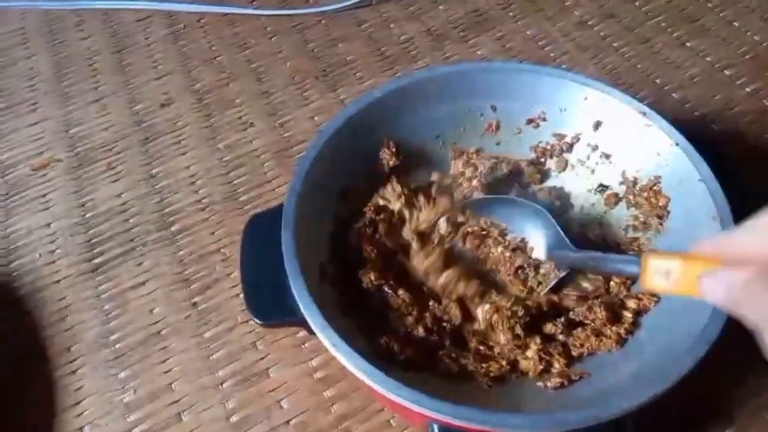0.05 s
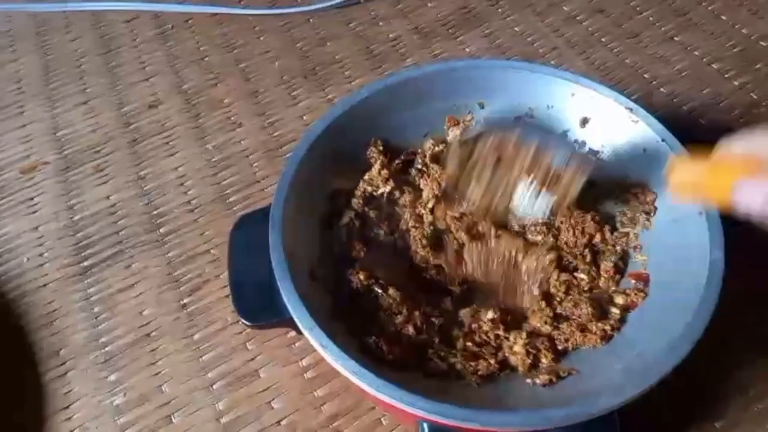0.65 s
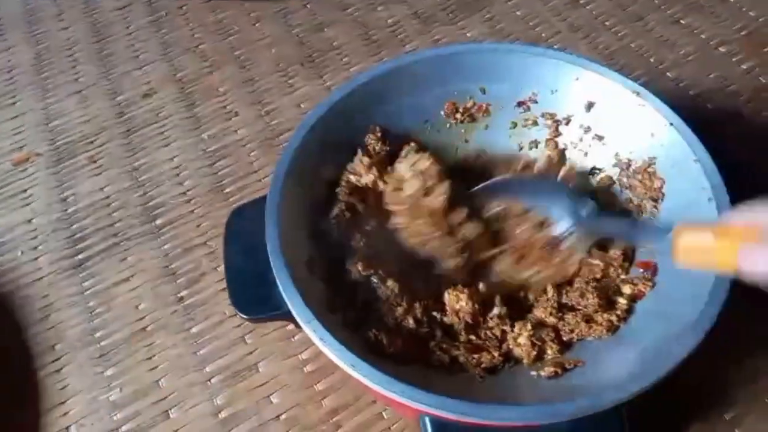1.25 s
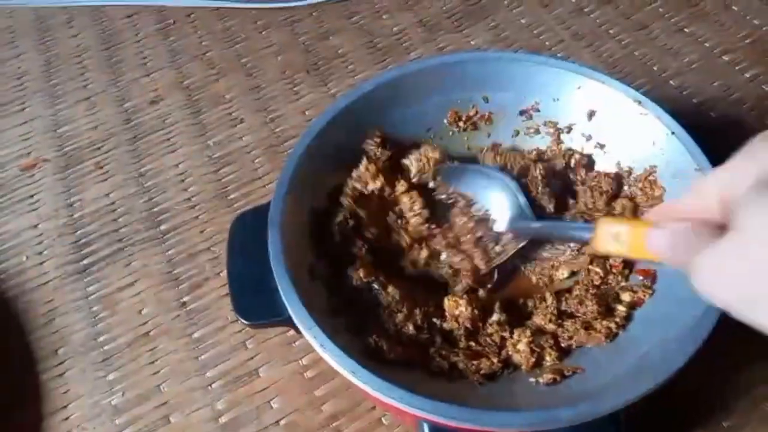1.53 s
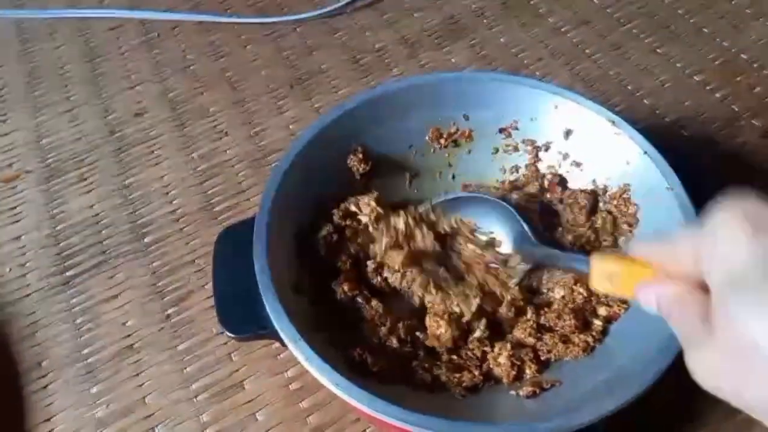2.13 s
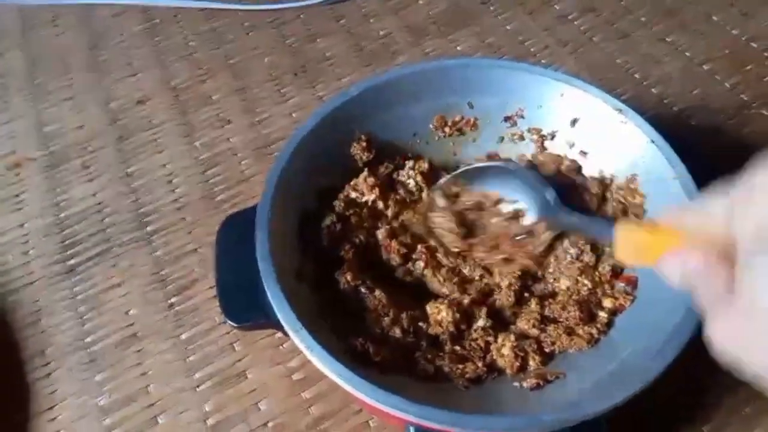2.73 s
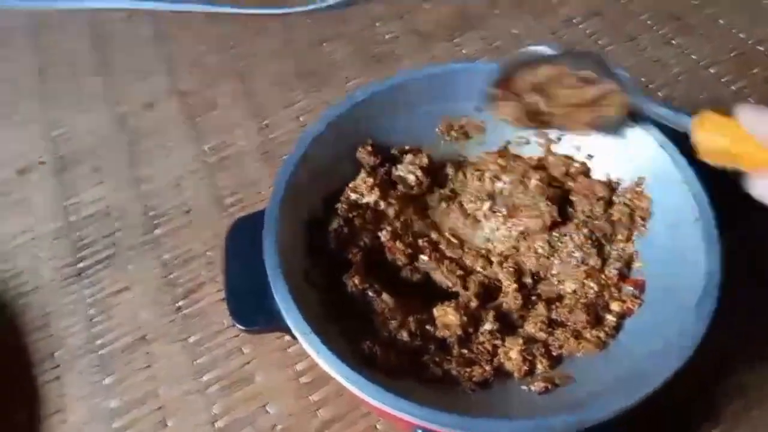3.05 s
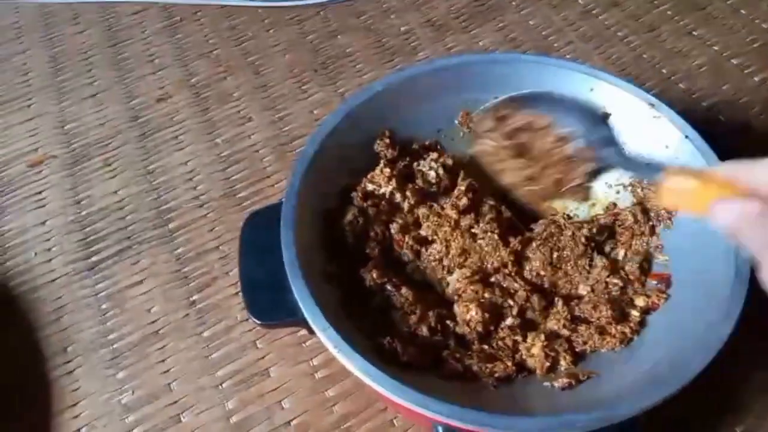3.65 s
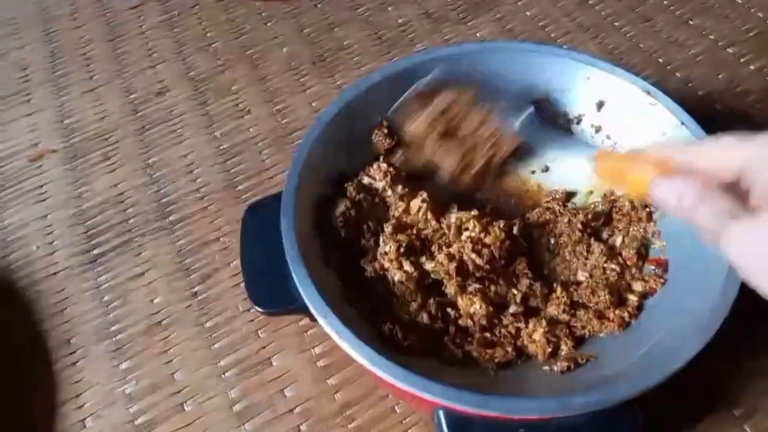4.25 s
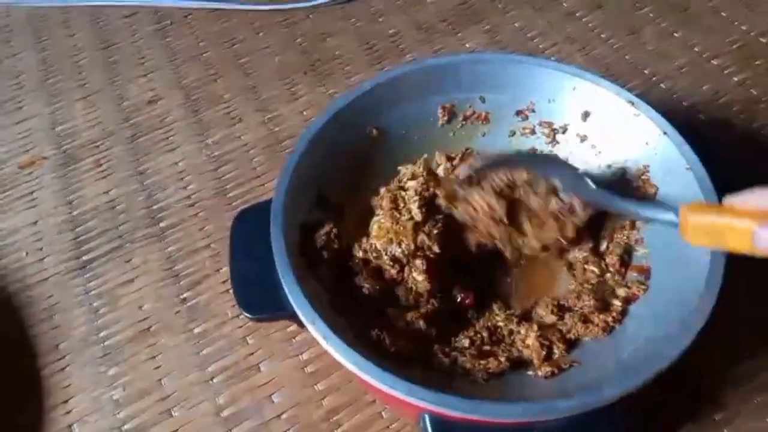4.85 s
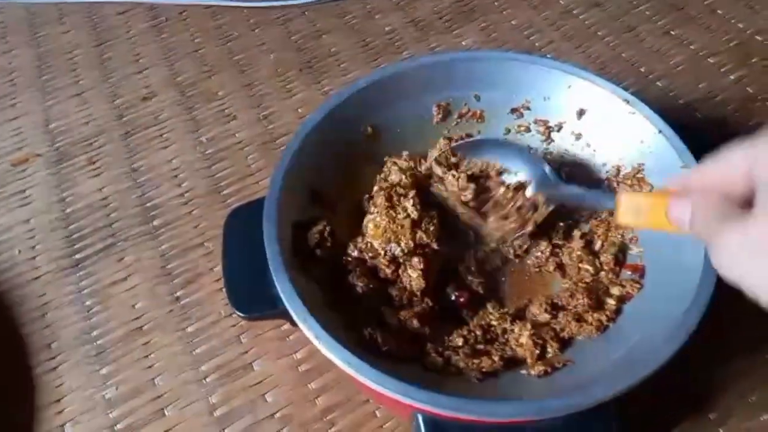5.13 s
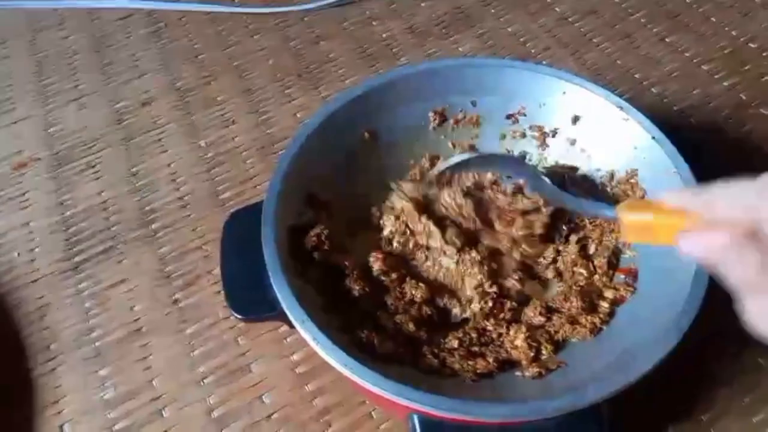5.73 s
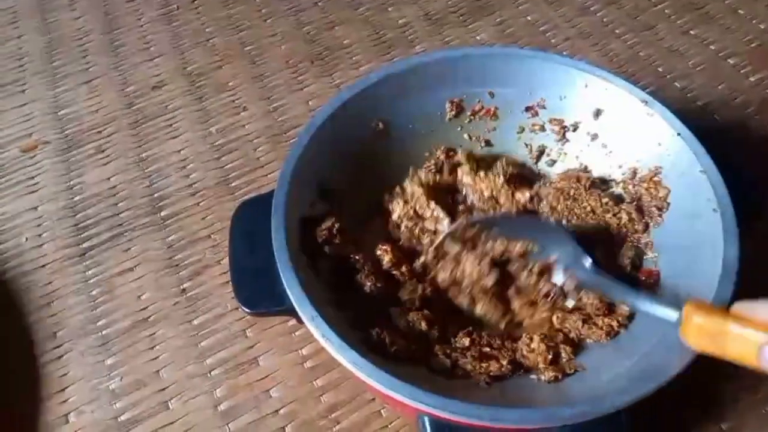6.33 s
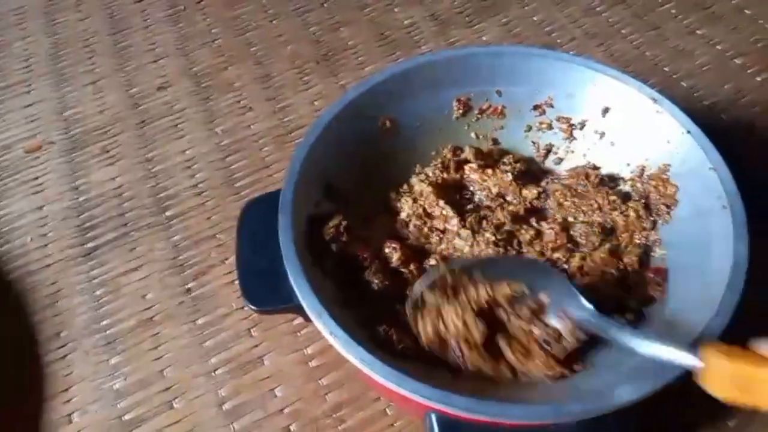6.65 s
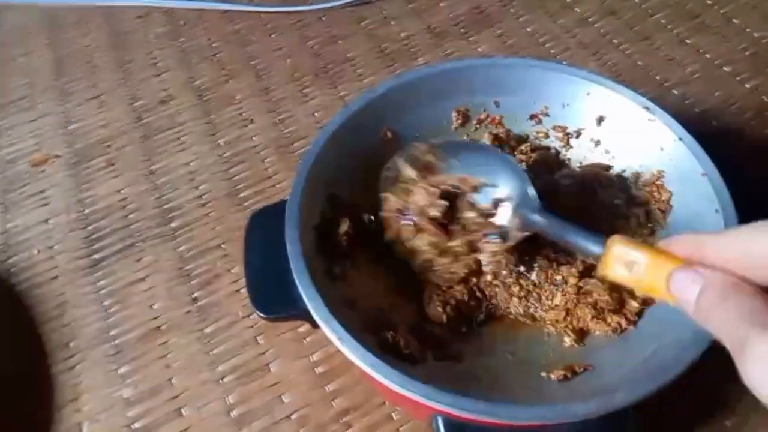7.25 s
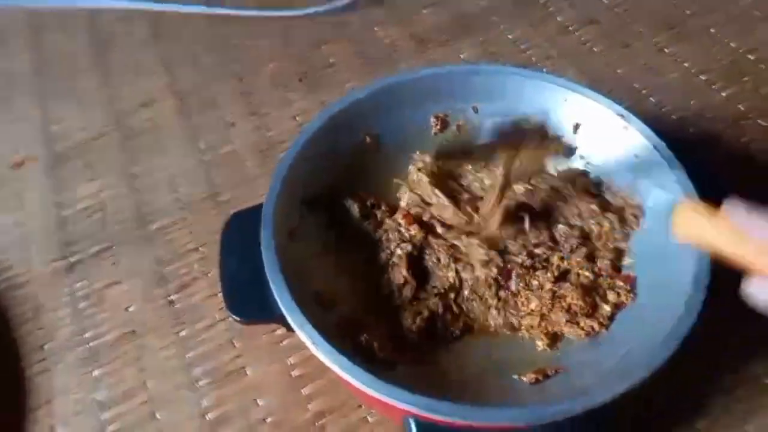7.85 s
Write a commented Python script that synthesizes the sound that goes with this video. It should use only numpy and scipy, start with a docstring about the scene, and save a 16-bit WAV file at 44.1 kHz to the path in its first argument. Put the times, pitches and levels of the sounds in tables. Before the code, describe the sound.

Thick paste sizzles softly in a small frying pan throughout, close to the microphone and slightly to the left. A steel spoon stirs it in quick, uneven strokes, each bringing a wet squelch, a grainy drag and a swell of hiss. For the first three seconds the spoon makes only light scrapes and ticks. A sharp metal knock and scrape comes at about 3.2 seconds, with further clinks at 3.7, 4.2 and 6.3. The loudest knocks land at 6.7 and 7 seconds, with a scrape and a tiny squeak between them, followed by a lighter tap at 7.5. They ring briefly in the kitchen. From about 1 second a draught rumbles and thumps on the microphone, first only on the right, then on both sides from 3 seconds, strongest around 5.7 and just before the end at 8 seconds.

```python
"""Thick paste sizzles and squelches as a steel spoon stirs it in a small electric frying pan.
Steam bubbles burst in the oil, and each stroke tears the wet paste and drags it over the pan floor.
Now and then the spoon knocks, scrapes or squeaks; knocks and scrapes ring the metal and echo in the
kitchen. A draught rumbles and thumps on the two microphone openings (ports) of a phone close by,
at first only the right one."""
import sys
import numpy as np
from scipy import signal
from scipy.fft import rfft, irfft, next_fast_len
from scipy.io import wavfile
from scipy.ndimage import uniform_filter1d

SR = 44100
rng = np.random.default_rng(int(sys.argv[2]) if len(sys.argv) > 2 else 0)


def digitize_waveform(pressure):
    """Quantize a signal to 16-bit integers and store it at the path in sys.argv[1].

    Rows of a 2-D input are taken as channels; values are limited to [-1, 1].
    """
    field = np.atleast_2d(pressure).T
    bounded = np.clip(field, -1, 1)
    quanta = np.round(bounded * 32767).astype(np.int16)
    wavfile.write(sys.argv[1], SR, quanta)


N = 352869
TIME = np.arange(N) / SR


def undb(db):
    """Turn decibels into a number to multiply by."""
    return 10 ** (np.asarray(db) / 20)


def unit(x):
    """Scale a signal to an average strength (rms) of 1."""
    return x / np.sqrt(np.mean(x ** 2) + 1e-20)


def equalise(x, points):
    """Turn each frequency up or down along a curve of (frequency [Hz], level [dB]) points."""
    size = next_fast_len(x.shape[-1])
    hz, db = np.transpose(points)
    bin_hz = np.arange(size // 2 + 1) * SR / size
    gain = undb(np.interp(np.log(bin_hz + 1), np.log(hz), db))
    return irfft(rfft(x, size) * gain, size)[..., :x.shape[-1]]


def colour(x, points):
    """Shape the tone of x, then set its strength to 1."""
    return unit(equalise(x, points))


def band(x, lo_hz, hi_hz):
    """Keep the frequencies between two limits."""
    return signal.sosfilt(signal.butter(2, [lo_hz, min(hi_hz, .45 * SR)], "band", fs=SR, output="sos"), x)


def walk(rate):
    """A wandering curve of strength 1 that glides to a new random value rate times a second."""
    hold = max(int(SR / rate), 1)
    steps = rng.standard_normal(N)[np.arange(N) // hold]
    return unit(uniform_filter1d(steps, hold))


def pops(rate, spread_db, size=N):
    """Random clicks, rate a second; spread_db makes a few stand out."""
    strength = undb(spread_db * np.minimum(rng.exponential(size=size), 5))
    return unit((rng.random(size) < rate / SR) * rng.choice([-1, 1], size) * strength)


def swell(start, length, rise_s, sag_db_per_s, fade_s):
    """A loudness curve: it rises, holds or sags, then falls 60 dB every fade_s."""
    age = TIME - start
    fall_db = sag_db_per_s * np.clip(age, 0, length) + 60 * np.maximum(age - length, 0) / fade_s
    return np.clip(age / rise_s, 0, 1) * undb(-fall_db)


def sideways(x, left_db):
    """Make the left side louder than the right by left_db."""
    return x * undb(np.array([[left_db], [-left_db]]) / 2)


def add(track, s, sound):
    """Mix a stereo sound into the track at time s."""
    start = int(s * SR)
    track[:, start:start + sound.shape[1]] += sound[:, :N - start]


def even_out(x, hold_s):
    """Hold the strength near 1 over each stretch of hold_s; quicker bumps remain."""
    return x / np.sqrt(uniform_filter1d(x ** 2, int(hold_s * SR)) + 1e-6)


def noise(points):
    """Noise with the given tone, unrelated on the left and right."""
    return colour(rng.standard_normal((2, N)), points)


# tone of the kitchen's background (frequency [Hz], level [dB])
MURMUR_TONE = [(20, -20), (70, -5), (150, 0), (400, -3.5), (1000, -11), (10000, -15)]
def kitchen_murmur():
    """A faint, low, steady noise fills the room."""
    return undb(-63.5) * noise(MURMUR_TONE)


# tone of the wind's deep rumble and of its small swirls (frequency [Hz], level [dB])
RUMBLE_TONE = [(20, -42), (35, -13.5), (60, 4.5), (80, 3.5), (115, -0.5), (160, -13), (240, -27),
               (400, -34.5), (900, -60)]
EDDY_TONE = [(50, -17), (130, 3.5), (230, 4.5), (330, -12.5), (500, -30), (1000, -61)]
# gusts of air (start [s], length [s], left level [dB], right level [dB])
AIR_GUSTS = [(0.95, 0.35, -82, -45.5), (1.385, 0.034, -73, -42), (1.5, 0.21, -76, -45),
             (2.182, 0.4, -86, -39.5), (2.399, 0.2, -60, -37.5), (2.727, 0.26, -61, -35),
             (2.908, 0.098, -33.5, -32), (2.98, 0.17, -48, -34), (3.17, 0.036, -46, -39),
             (3.512, 0.018, -61, -29.5), (3.607, 0.13, -48, -43.5), (3.723, 0.096, -56, -28),
             (3.82, 0.19, -41, -42.5), (4.052, 0.33, -50, -38.5), (4.223, 0.21, -50, -36),
             (4.46, 0.16, -48, -33.5), (4.638, 0.14, -36.5, -41), (4.858, 0.061, -42, -39),
             (4.955, 0.064, -33, -41.5), (5.057, 0.14, -41, -43.5), (5.264, 0.18, -38, -34.5),
             (5.462, 0.23, -31.5, -30), (5.669, 0.14, -23, -30.5), (5.88, 0.11, -35.5, -47),
             (6.029, 0.099, -39, -31), (6.166, 0.035, -43, -42), (6.27, 0.31, -45.5, -53.5),
             (6.613, 0.038, -40, -47), (6.692, 0.25, -54, -35.5), (6.945, 0.02, -28.5, -32),
             (6.992, 0.21, -48, -41), (7.227, 0.25, -59, -42), (7.406, 0.2, -42, -36),
             (7.553, 0.32, -31.5, -34), (7.832, 0.043, -22, -27), (7.904, 0.22, -29.5, -38)]
def draught():
    """Moving air rumbles on each port; stronger gusts shed smaller, higher swirls (eddies)."""
    power = undb(-73) ** 2  # nearly still air
    for start, length, left_db, right_db in AIR_GUSTS:
        shape = swell(start, length, rise_s=.033, sag_db_per_s=0, fade_s=.32)
        power = power + (undb([[left_db], [right_db]]) * shape) ** 2
    gust = np.sqrt(power)
    eddies = even_out(noise(EDDY_TONE), hold_s=.054) * undb(-6 + 5.5 * walk(45))
    eddies *= (gust / undb(-25.5)) ** .7
    rumble = even_out(noise(RUMBLE_TONE), hold_s=.04)
    bumps = undb(4 * np.array([walk(30), walk(30)]))
    return undb(2.7) * gust * even_out((rumble + eddies) * bumps, hold_s=.12)


# single strong swirls, listed for each port (time [s], pitch [Hz], relative level [dB])
AIR_THUMPS = {"left": [(2.992, 77, -14.5), (3.86, 90, -35), (3.94, 90, -51), (4.11, 90, -31),
              (4.4, 95, -25), (4.46, 95, -32), (4.701, 80, -15), (4.775, 89.5, -18.5), (5.025, 82, -12),
              (5.283, 91, -17), (5.526, 97, -15), (5.6, 95, -25), (5.721, 104, -10.5), (5.779, 106, -17),
              (5.978, 95.5, -15.5), (6.075, 90, -23), (6.972, 99, -10.5), (7.465, 90, -20),
              (7.581, 112, -14), (7.666, 86.5, -25), (7.861, 119, -9), (7.91, 96, -17)],
              "right": [(1.108, 96, -25.5), (1.169, 96, -23.5), (1.246, 119, -18), (1.325, 90, -31),
              (1.448, 81, -24), (1.62, 108, -25.5), (2.445, 82.6, -18), (2.575, 84, -32),
              (2.801, 85, -18.5), (2.879, 123, -15.5), (2.98, 94.5, -12), (3.055, 93, -12.5),
              (3.215, 83, -12), (3.554, 101, -15), (3.756, 77, -20.5), (3.805, 120, -11),
              (4.161, 113, -9.5), (4.307, 96, -20), (4.36, 119, -15.5), (4.537, 114, -12.5),
              (4.593, 106, -14.5), (4.653, 112, -18.5), (4.925, 88, -22.5), (5.168, 87, -15.5),
              (5.274, 87, -22.5), (5.345, 95, -29), (5.409, 98, -14.5), (5.502, 115, -13), (5.63, 100, -20),
              (5.675, 76, -14), (5.786, 101, -15), (6.129, 105, -16), (6.765, 99, -22),
              (6.835, 95.5, -21.5), (6.947, 125, -16), (7.079, 88.6, -16.5), (7.17, 95, -21),
              (7.504, 95, -12.5), (7.593, 108, -12.5), (7.637, 133, -12.5), (7.733, 118, -11.5),
              (7.875, 108, -15), (7.938, 112, -18.5)]}
def thumps():
    """A swirl sweeps over a port: the pressure swings once or twice, slowing as it passes."""
    out = np.zeros((2, N))
    t = np.arange(-SR // 10, SR // 10) / SR
    rise_cycles, fall_cycles = .67, .8
    for port, side in zip(np.eye(2), ("left", "right")):
        for s, hz, db in AIR_THUMPS[side]:
            cycles = hz * t
            shape = np.exp(-np.abs(cycles / np.where(t < 0, rise_cycles, fall_cycles)) ** 1.5)
            swing = np.sin(2 * np.pi * (cycles - .15 * cycles ** 2 + rng.random()))
            add(out, s + t[0], port[:, None] * undb(db - 3.5) * shape * swing)
    return out


# how long the kitchen echoes (frequency [Hz], time to fade by 60 dB [s])
ECHO_TIMES = [(250, 0.35), (500, 0.52), (1500, 0.5), (5000, 0.62), (12000, 0.14)]
def kitchen_echo(x, gap_s):
    """After a tiny gap the walls send back a blur of echoes; the highest treble dies first."""
    t = np.arange(SR * 3 // 4) / SR
    hz, fade_times = np.transpose(ECHO_TIMES)
    tail = 0
    for centre in 125 * 2. ** np.arange(8):
        octave = band(rng.standard_normal((2, len(t))), centre / np.sqrt(2), centre * np.sqrt(2))
        fade_s = np.interp(np.log(centre), np.log(hz), fade_times)
        tail = tail + octave * undb(-60 * t / fade_s)
    tail *= np.clip(t / gap_s - 1, 0, 1)
    tail /= np.linalg.norm(tail, axis=1, keepdims=True)
    return signal.oaconvolve(x, tail, axes=1)[:, :N]


def ring(notes, centre_hz, octaves, phase_spread, crack_db, crack_s, detune):
    """Struck metal rings with its own notes; the spot that is hit favours those near centre_hz."""
    t = np.arange(SR // 3) / SR
    tones = 0
    for hz, db, fade_s in notes:
        favour = np.exp(-.5 * (np.log2(hz / centre_hz) / octaves) ** 2)
        phase = rng.uniform(0, 2 * np.pi) + phase_spread * rng.choice([-1, 1]) * np.array([[0], [1]])
        shifted_hz = hz * (1 + detune * rng.uniform(-.71, 1))  # clinging paste shifts each note
        tones = tones + favour * undb(db - 60 * t / fade_s) * np.sin(2 * np.pi * shifted_hz * t + phase)
    onset = np.minimum(t * centre_hz * 2, 1)
    # countless weak overtones die at once and make the crack
    burst = rng.standard_normal((2, len(t))) * undb(-60 * t / crack_s)
    crack = band(burst, centre_hz / 2 ** octaves, centre_hz * 2 ** octaves)
    hit = unit(tones * onset) + undb(crack_db) * unit(crack)
    first_5_ms = hit[:, :SR // 200]
    return hit / np.sqrt(np.mean(first_5_ms ** 2, axis=1, keepdims=True))


# the notes each metal part rings with (pitch [Hz], level [dB], time to fade by 60 dB [s])
BODY_NOTES = [(257, -1.5, 0.12), (307, 1.5, 0.082), (340, -2.5, 0.054), (376, -4.5, 0.063), (451, 3, 0.041),
              (459.7, -4.5, 0.14), (499.7, -8.5, 0.27), (528.5, -4.5, 0.25), (567.6, -18.5, 0.2)]
WALL_NOTES = [(794, -7, 0.023), (926, 10.5, 0.0056), (1060, 11, 0.0037), (1297, -7, 0.042),
              (1470, -14, 0.084), (1496, -4, 0.028), (1714, -1.5, 0.0065), (1840, 4, 0.01),
              (2480, 4.5, 0.0083)]
SPOON_NOTES = [(3380, 4, 0.017), (3700, 10, 0.014), (5280, 6, 0.029), (6950, -7, 0.0095),
               (7580, 7.8, 0.025), (8100, 14, 0.014), (9930, 13, 0.015), (10340, 6.5, 0.016),
               (10840, -3, 0.014), (13200, 11, 0.015)]
def contact(body_hz, wall_hz, spoon_hz):
    """One touch rings three parts: the pan's body, its wall and the spoon."""
    body = ring(BODY_NOTES, body_hz, octaves=.39, phase_spread=.19,
                crack_db=-11, crack_s=.06, detune=.005)
    wall = ring(WALL_NOTES, wall_hz, octaves=.37, phase_spread=.69,
                crack_db=-4.5, crack_s=.02, detune=.025)
    spoon = ring(SPOON_NOTES, spoon_hz, octaves=1.25, phase_spread=1,
                 crack_db=7.5, crack_s=.013, detune=.04)
    return sideways(body, .5), sideways(wall, .41), sideways(spoon, .14)


# squeaks of the spoon (time [s], length [s], pitch [Hz], level [dB], octave above, relative [dB])
SPOON_SQUEAKS = [(5.58, .028, 955, -43, 1), (6.747, .012, 1370, -26, -14), (6.758, .012, 1350, -27, -14),
                 (6.773, .008, 1400, -31, -14)]
def squeaks():
    """For a moment the spoon's tiny slips fall roughly into step and make a tone."""
    out = np.zeros(N)
    waver = 1 + .035 * walk(900)
    rasp = undb(3 * walk(400) - 1)
    for s, length, hz, db, octave_db in SPOON_SQUEAKS:
        phase = 2 * np.pi * np.cumsum(hz * waver) / SR
        tone = np.sin(phase) + undb(octave_db) * np.sin(2 * phase)
        out += tone * rasp * undb(db) * np.exp(-(2 * (TIME - s) / length) ** 2)
    return out


# the spoon's edge on bare metal (start [s], length [s], fade over that length [dB], body level [dB],
# wall level [dB], wall centre [Hz], spoon level [dB], spoon centre [Hz])
SPOON_SCRAPES = [(0.065, 0.087, 0, -73, -60, 1900, -47.5, 4500),
                 (0.939, 0.072, 1, -75, -53.5, 1310, -42.5, 7500),
                 (1.214, 0.016, 7, -73, -55, 1100, -36, 3300),
                 (1.261, 0.045, 0, -61, -44.5, 1390, -53, 3030),
                 (1.53, 0.027, 3, -73, -41, 1910, -46, 3500), (1.879, 0.07, 4, -72, -45, 2100, -47, 9000),
                 (2.462, 0.04, 7, -69, -44, 2000, -42, 4500), (2.571, 0.018, 3, -72, -44, 1880, -40, 11000),
                 (2.767, 0.042, 7, -67, -43.5, 2000, -41, 4200),
                 (3.175, 0.034, 3, -27, -27, 1590, -30, 5050), (3.204, 0.094, 7, -39, -36, 1530, -33, 6800),
                 (3.698, 0.038, 19, -42, -59, 1500, -41, 7000), (4.22, 0.046, 8, -47, -40, 1650, -32, 7500),
                 (5.064, 0.049, -1, -69, -44, 1680, -39.5, 3600),
                 (5.373, 0.023, 0, -60, -43, 1920, -49, 3200), (5.96, 0.035, 4, -60, -53, 1600, -39, 4800),
                 (6.301, 0.022, 5, -32.5, -61, 1400, -39, 7000),
                 (6.656, 0.0062, 3, -38, -21, 1390, -19, 7860),
                 (6.664, 0.082, -0.5, -30.5, -31.5, 1500, -35, 6400),
                 (6.731, 0.0425, 1, -46, -29, 1480, -28, 7200),
                 (7.066, 0.065, 8.5, -32.5, -50, 950, -33.5, 5960),
                 (7.477, 0.046, -4.5, -37, -41, 1460, -36.5, 5600)]
def scrapes():
    """The edge catches on grit and lets go; every tiny slip rings the metal."""
    out = np.zeros((2, N))
    catch_s, catch_db = .006, 5  # how long a grip lasts, how far its force varies
    for s, length, fade_db, body_db, wall_db, wall_hz, spoon_db, spoon_hz in SPOON_SCRAPES:
        size = int(length * SR)
        press = signal.windows.tukey(size, .2) * undb(-fade_db * np.linspace(0, 1, size))
        catches = undb(catch_db * rng.uniform(-1, 1, size))[np.arange(size) // int(catch_s * SR)]
        slips = press * unit(catches * pops(rate=1100, spread_db=2, size=SR)[:size])
        parts = contact(body_hz=384, wall_hz=wall_hz, spoon_hz=spoon_hz)
        for part, db in zip(parts, (body_db, wall_db, spoon_db)):
            ringing = signal.fftconvolve(slips[None], part / np.linalg.norm(part[0]), axes=1)
            add(out, s, undb(db) * ringing)
    return out


# the spoon hits the pan (time [s], body level [dB], # body centre [Hz], wall level [dB], wall centre [Hz],
# spoon level [dB], spoon centre [Hz])
SPOON_KNOCKS = [(0.262, -62, 300, -60, 1900, -42, 3600), (1.166, -71, 300, -45, 1500, -40, 9500),
                (2.001, -70, 300, -41, 1790, -39, 5000), (2.456, -64, 297, -38, 1920, -35, 4300),
                (3.168, -23.5, 410, -18, 1370, -19, 6400), (3.689, -32.5, 473, -31, 1550, -30, 7500),
                (4.2110, -36, 570, -23, 1660, -15, 8000), (4.237, -34, 526, -48, 1500, -50, 7000),
                (6.2790, -26.5, 406, -27.5, 1470, -24, 7700),
                (6.6572, -20, 350, -16.5, 1080, -10.5, 7400),
                (7.0407, -20.5, 385, -14, 1070, -14.5, 6600),
                (7.4791, -32.5, 343, -32.5, 1110, -32, 4940), (7.637, -41, 273, -50, 1500, -38, 6000)]
def spoon_knocks():
    """Each is one sharp touch: a clunk or clink of metal."""
    out = np.zeros((2, N))
    for s, body_db, body_hz, wall_db, wall_hz, spoon_db, spoon_hz in SPOON_KNOCKS:
        for part, db in zip(contact(body_hz, wall_hz, spoon_hz), (body_db, wall_db, spoon_db)):
            add(out, s, undb(db) * part)
    return out


def spoon_on_pan():
    """Sharp touches, scrapes and squeaks together; the kitchen echoes the first two."""
    touches, scraping = spoon_knocks(), scrapes()
    echoes = kitchen_echo(undb(-9) * touches + undb(-8.5) * scraping, gap_s=.0015)
    return (touches + scraping + echoes) * undb(-1.5) + squeaks()


def crackle(points, rate, spread_db, likeness):
    """Dense tiny clicks from all over the pan; likeness is the share that both ports hear alike."""
    shared, left, right = (pops(rate, spread_db) for _ in range(3))
    return colour(np.sqrt(likeness) * shared + np.sqrt(1 - likeness) * np.array([left, right]), points)


# tone of the sliding paste (frequency [Hz], level [dB])
DRAG_TONE = [(120, 0), (300, -3), (480, -7.5), (620, -16), (780, -0.5), (1150, 3), (1500, 3), (3000, -47)]
def drag():
    """Paste rubs over the pan floor with a low, grainy noise."""
    return crackle(DRAG_TONE, rate=1200, spread_db=0, likeness=.65)


def air_pockets(count):
    """Air pockets pop in the pressed paste, each rising in pitch as it opens."""
    out = np.zeros((2, N))
    t = np.arange(SR // 50) / SR
    middle_hz, spread_octaves, fade_cycles = 2150, .6, 2.2
    times = rng.random(count) * TIME[-1]
    pitches = middle_hz * 2 ** (spread_octaves * np.clip(rng.standard_normal(count), -2, 2))
    gains = undb(3.5 * np.minimum(rng.exponential(size=count), 3.5))  # many small, a few large
    right_phases = rng.uniform(-1.5, 1.5, count)
    for s, hz, gain, right_phase in zip(times, pitches, gains, right_phases):
        cycles = hz * t
        phase = 2 * np.pi * cycles * (1 + .004 * cycles) + np.array([[0], [right_phase]])
        add(out, s, gain * np.exp(-cycles / fade_cycles) * np.sin(phase))
    return unit(out)


# tone of the tearing paste (frequency [Hz], level [dB])
SQUELCH_TONE = [(500, -46), (1000, -29), (1400, -0.5), (2200, 5), (2900, -1), (5000, -0.5), (12000, -40)]
# hollows between spoon, paste and pan (pitch [Hz], width [Hz], level [dB])
PASTE_HOLLOWS = [(1360, 240, 15), (1572, 280, 8), (2104, 98, 3), (2910, 95, 11)]
def squelch():
    """Wet paste tears; hollows under the spoon open and close, each ringing in its own time."""
    tearing = crackle(SQUELCH_TONE, rate=1500, spread_db=1.4, likeness=.68)
    hollows = sum(undb(db + 3.2 * walk(45)) * band(tearing, hz - width / 2, hz + width / 2)
                  for hz, width, db in PASTE_HOLLOWS)
    return unit(tearing + undb(-5) * unit(hollows) + undb(-7) * air_pockets(count=4000))


# tone of the bursting bubbles (frequency [Hz], level [dB])
SIZZLE_TONE = [(200, -16), (600, -29), (1000, -22), (1600, 2), (2600, -3), (4000, 2.5), (7000, 2.5),
               (8900, 4), (9550, 4.5), (10300, 4.5), (12000, 5), (13300, 9.5), (15000, -17)]
# bright bands that come and go with the oil (centre [Hz], width [Hz], level [dB])
OIL_SHIMMERS = [(9440, 720, -19), (14000, 1400, -8)]
def sizzle():
    """Thousands of tiny steam bubbles burst in the oil each second and blur into a hiss."""
    bubbles = crackle(SIZZLE_TONE, rate=12000, spread_db=2.5, likeness=.011)
    shimmer = sum(undb(db + 4 * walk(7)) * band(bubbles, hz - width / 2, hz + width / 2)
                  for hz, width, db in OIL_SHIMMERS)
    flicker = undb(.55 * walk(50))
    return unit(bubbles + shimmer) * flicker


# strokes of the spoon (start [s], length [s], time to dig in [s], sizzle level [dB],
# squelch level [dB], drag level [dB])
SPOON_STROKES = [(-0.007, 0.19, 0.085, -42, -47, -56.5), (0.228, 0.24, 0.022, -46.5, -53.5, -83),
                 (0.43, 0.1, 0.07, -39, -50, -54.5), (0.593, 0.38, 0.053, -40, -77, -85),
                 (0.905, 0.095, 0.054, -38.5, -49, -61), (1.102, 0.17, 0.13, -39.5, -45, -45),
                 (1.243, 0.27, .035, -39, -57, -75), (1.495, 0.086, 0.035, -37.5, -47.5, -48),
                 (1.588, 0.2, 0.044, -38.5, -54, -62), (1.798, 0.19, 0.077, -38.5, -46.5, -59),
                 (2.141, 0.024, 0.019, -39, -48, -54), (2.23, 0.28, 0.027, -47.5, -49.5, -78),
                 (2.442, 0.18, 0.015, -41, -49, -55.5), (2.72, 0.19, 0.04, -43, -48, -62),
                 (2.91, 0.92, 0.053, -43, -55, -79), (3.287, 0.23, 0.035, -69, -52.5, -54),
                 (3.48, .07, 0.057, -46.5, -49.5, -66), (3.68, 0.12, 0.06, -43, -49, -54),
                 (3.96, 0.39, 0.023, -65, -56, -53.5), (4.243, 0.19, 0.023, -44.5, -51, -50),
                 (4.493, 0.31, 0.057, -45.5, -58, -54.5), (4.693, 0.093, 0.14, -30.5, -38.5, -42.5),
                 (4.855, 0.18, 0.028, -39, -49, -78), (5.03, 0.051, 0.031, -36.5, -40.5, -45.5),
                 (5.154, 0.17, 0.044, -40.5, -56, -75), (5.33, 0.055, 0.048, -37, -44, -52),
                 (5.41, 0.1, 0.055, -36, -46.5, -54), (5.522, 0.21, 0.069, -43, -46, -50),
                 (5.644, 0.13, 0.07, -38.5, -56, -50), (5.93, 0.15, 0.037, -43, -52.5, -54.5),
                 (6.282, 0.12, 0.058, -37.5, -56, -48), (6.484, 0.22, 0.14, -46.5, -75, -76),
                 (6.755, 0.14, 0.046, -37.5, -68, -51.5), (7.116, 0.15, 0.045, -38.5, -56, -63),
                 (7.472, 0.058, 0.04, -36.5, -50, -46), (7.732, 0.092, 0.043, -41, -66, -53)]
def stirred_paste():
    """Each stroke lifts sizzle, squelch and drag above the simmer, then eases as the paste gives way."""
    power = undb([[-45.5], [-63.5], [-63.5]]) ** 2 * np.ones(N)  # the three sounds between strokes
    fades_s = .64, .59, .59  # the paste spits a little longer than it slides
    for start, length, dig_s, *levels_db in SPOON_STROKES:
        for layer, (db, fade_s) in enumerate(zip(levels_db, fades_s)):
            stroke = swell(start, length, dig_s, sag_db_per_s=11.5, fade_s=fade_s)
            power[layer] += (undb(db) * stroke) ** 2
    spitting, pushing, sliding = np.sqrt(power)
    sizzling = sizzle() * spitting
    jerks = undb(1.7 * walk(110) + .4 * walk(18) - .3)  # the paste sticks and lets go
    squelching = squelch() * pushing * jerks * undb(.5)
    dragging = drag() * sliding * jerks
    return sizzling + sideways(squelching, 1.3) + sideways(dragging, .5)


def scene():
    """The pan sits a little to the left, with the draught and the kitchen's murmur around it."""
    pan = stirred_paste() + spoon_on_pan()
    return sideways(pan, .73) + draught() + thumps() + kitchen_murmur()


# how each microphone port changes the tone (frequency [Hz], level [dB])
LEFT_TONE = [(1000, -1.5), (2100, 2.5), (2500, 2), (2900, 2), (3300, 0.5), (5000, -0.06), (6300, 3),
             (7300, 0.2), (8800, 0), (9550, 3), (11000, -1.5), (12000, -2), (13300, -3.5)]
RIGHT_TONE = [(300, 1.5), (500, -1), (650, 0.5), (950, -4), (1200, -3), (1450, -9.5), (1700, -3),
              (2700, 1.5), (4300, -1.5), (6800, -5), (8150, 1.5), (10000, -4), (11500, -2.5), (14000, -10)]
def record(dry):
    """Each port has its own tone; the phone cuts the deep bass, clips at full scale and cuts the top."""
    bass_cut = signal.butter(3, 38, "high", fs=SR, output="sos")
    treble_cut = signal.ellip(12, .2, 70, 14400, fs=SR, output="sos")
    heard = np.array([equalise(dry[0], LEFT_TONE), equalise(dry[1], RIGHT_TONE)])
    heard = signal.sosfilt(bass_cut, heard)
    return signal.sosfilt(treble_cut, np.clip(heard, -1, 1))


dry = scene()
out = record(dry)
digitize_waveform(out)
```